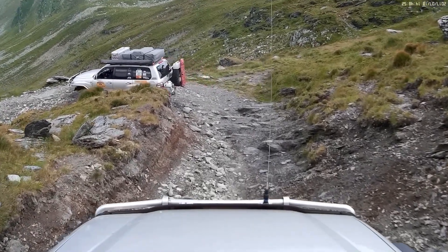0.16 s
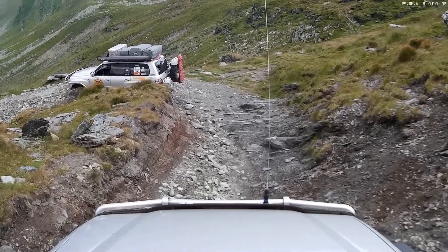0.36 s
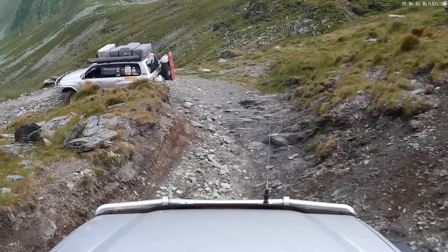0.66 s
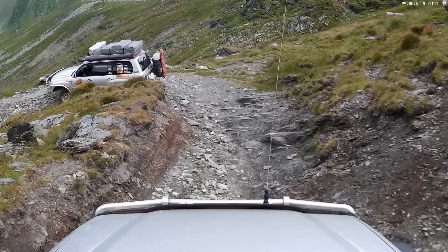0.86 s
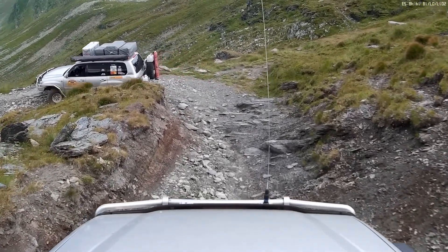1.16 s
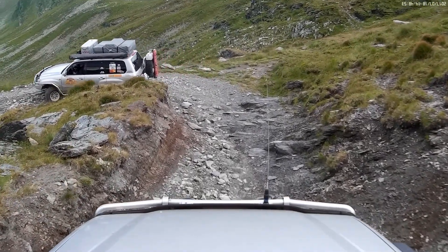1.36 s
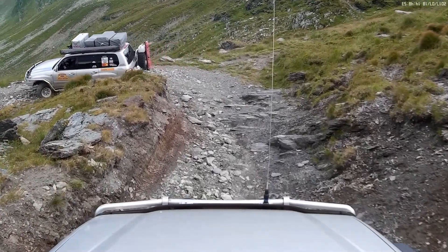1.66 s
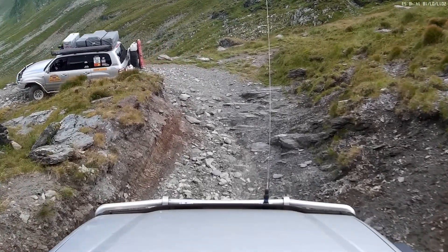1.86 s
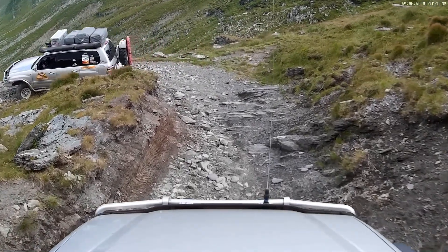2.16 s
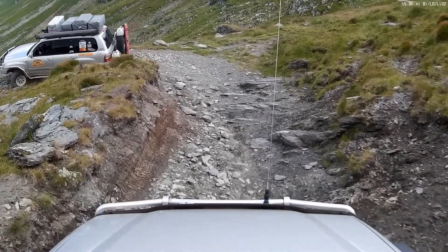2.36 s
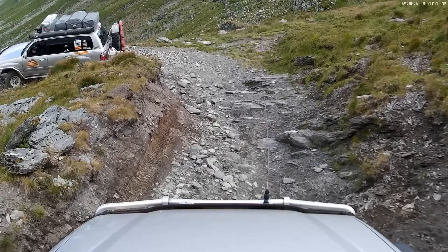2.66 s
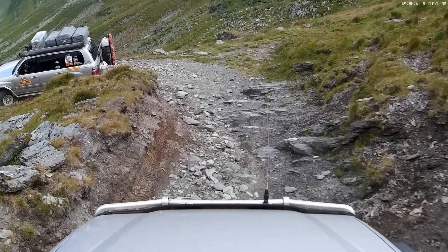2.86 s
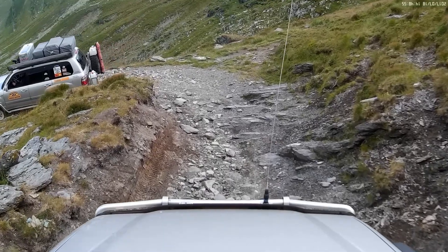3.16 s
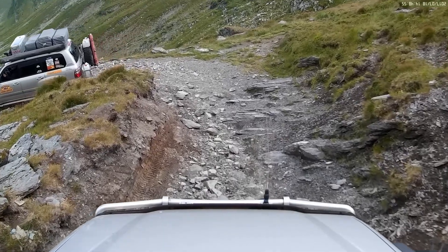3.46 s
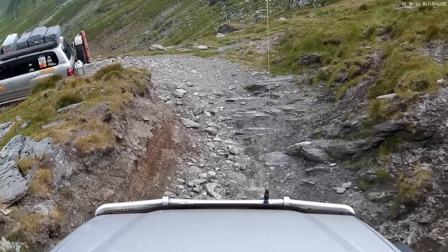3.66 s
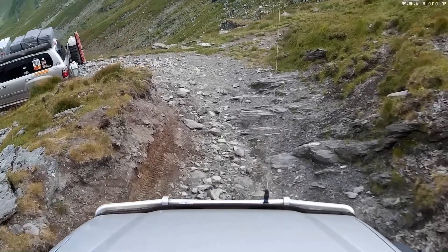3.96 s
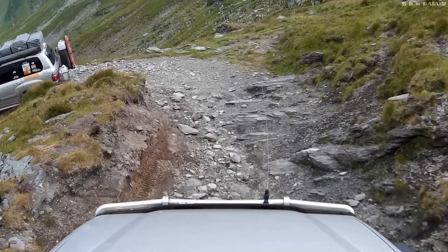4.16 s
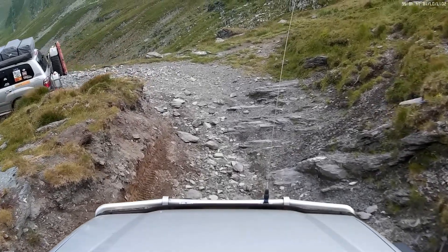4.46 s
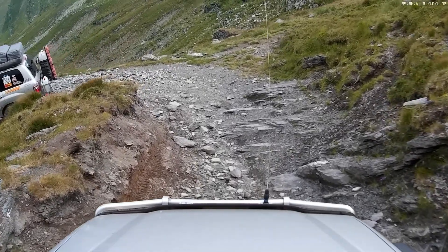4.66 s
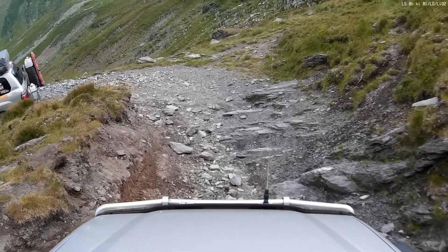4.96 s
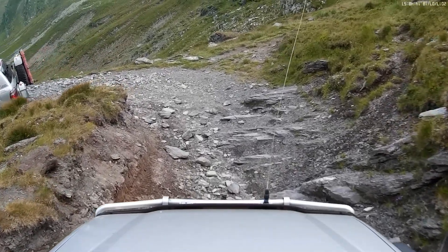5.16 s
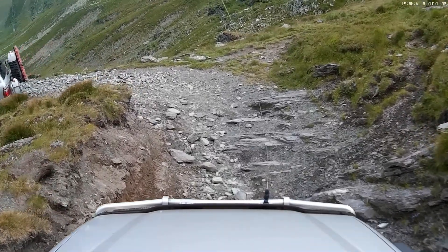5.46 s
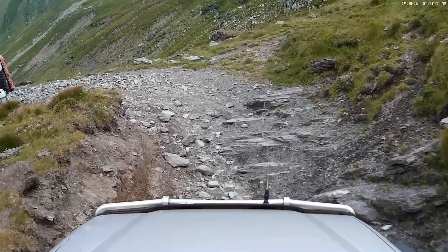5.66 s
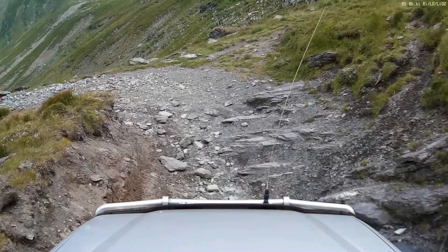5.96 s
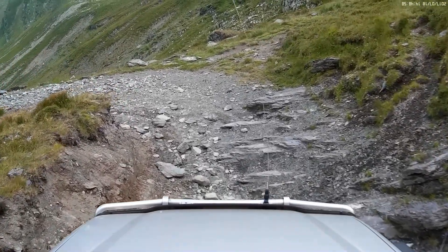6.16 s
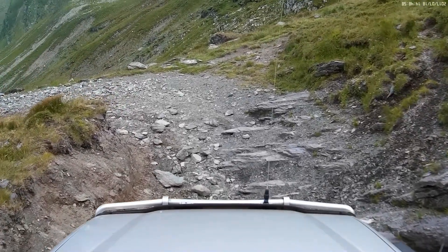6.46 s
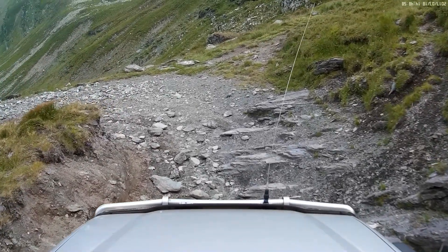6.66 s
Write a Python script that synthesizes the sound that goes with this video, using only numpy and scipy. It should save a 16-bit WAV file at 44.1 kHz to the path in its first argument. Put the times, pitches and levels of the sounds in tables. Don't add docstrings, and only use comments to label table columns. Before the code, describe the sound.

Loose gear slams and rattles against steel inside a four-wheel-drive crawling over rocks, with dull suspension thuds, a sharp metallic crash near three seconds and low diesel drone.

```python
import sys
import numpy as np
from scipy import signal
from scipy.fft import rfft, irfft, next_fast_len
from scipy.io import wavfile
from scipy.ndimage import uniform_filter1d, map_coordinates

SR = 44100
rng = np.random.default_rng(int(sys.argv[2]) if len(sys.argv) > 2 else 0)


def inscribe(sig):
    pcm = np.round(np.clip(np.atleast_2d(sig).T, -1, 1) * 32767)
    wavfile.write(sys.argv[1], SR, pcm.astype(np.int16))


def how_loud(loudness_db):
    steps = np.asarray(loudness_db, float) / 20
    return 10 ** steps


N = 299880
T = np.arange(N) / SR
MIDDLE_DB = -46


def unit(x):
    return x / np.sqrt(np.mean(x ** 2) + 1e-20)


def wobble(rate):
    return map_coordinates(rng.standard_normal(int(N * rate / SR) + 4), [T * rate])


def filtered(x, response):
    m = next_fast_len(N + SR // 2)
    return irfft(rfft(x, m) * response(np.fft.rfftfreq(m, 1 / SR)), m)[:N]


def colour(points):
    f, db = np.transpose(points)
    return lambda hz: how_loud(np.interp(np.log(hz + 1), np.log(f + 1), db))


def resonances(peaks):
    def response(f):
        return sum((-1) ** k * how_loud(db) * 1j * f * width / (hz * hz - f * f + 1j * f * width)
                   for k, (hz, width, db) in enumerate(peaks))
    return response


def smoothed(power):
    return np.abs(uniform_filter1d(uniform_filter1d(power, size=250), size=250)) + 1e-10


def shaken(drive, response, even=0.):
    m = next_fast_len(N + SR // 2)
    body = response(np.fft.rfftfreq(m, 1 / SR)) + 0j
    body = body / np.sqrt(np.mean(np.abs(body) ** 2))
    out = irfft(rfft(drive * rng.standard_normal(N), m) * body, m)[:N]
    if not even:
        return out
    expected = irfft(rfft(drive ** 2, m) * rfft(irfft(body, m) ** 2), m)[:N]
    return out * (smoothed(expected) / smoothed(out ** 2)) ** (even / 2)


def window(start, length, edge):
    return np.clip(np.minimum(T - start, start + length - T) / edge, 0, 1)


def varied(x, depth_db):
    z = signal.stft(x, nperseg=512)[2]
    field = uniform_filter1d(rng.standard_normal(z.shape), size=3, axis=0)
    field = uniform_filter1d(field, size=8, axis=1)
    return signal.istft(z * how_loud(depth_db * unit(field)), nperseg=512)[1][:N]


def jolts(times, levels_db, decays, rise, blow, blow_s):
    power, t = np.zeros(N + SR), np.arange(SR // 3) / SR
    first = blow * how_loud(-60 * t / blow_s)
    onset = 1 - np.exp(-t / rise)
    for s, db, t60 in zip(times, levels_db, np.abs(decays)):
        shake = np.exp(-np.log(1000) * t / t60) * onset
        power[round(s * SR):][:len(t)] += (how_loud(db) * (shake + first)) ** 2
    return np.sqrt(power[:N])


def strikes(times, levels_db, response):
    taps = np.zeros(N)
    taps[np.round(times * SR).astype(int)] = how_loud(levels_db) * np.sqrt(SR)
    body_rms = np.sqrt(np.mean(np.abs(response(np.arange(SR // 2) + .5)) ** 2))
    return filtered(taps, response) / body_rms


# (t/s, engine load level/dB, ground roughness level/dB)
CRAWL_CURVE = [(0, -44.5, -49), (.49, -42, -42.5), (.8, -45.5, -49), (1.29, -45, -47), (1.91, -47, -49.5),
               (2.18, -44.5, -48), (2.55, -49.5, -48), (2.75, -37, -40.5), (2.92, -36.5, -38),
               (3.14, -45.5, -43), (3.69, -46, -49), (4.3, -44.5, -46.5), (4.55, -46.5, -49.5),
               (4.93, -45.5, -44.5), (5.25, -47.5, -48), (5.74, -47, -44.5), (6.15, -50, -48.5),
               (6.8, -47.5, -48)]


def crawl():
    s, *columns = np.transpose(CRAWL_CURVE)
    return [np.interp(T, s, column) for column in columns]


# (t/s, firing f/Hz)
ENGINE_SPEED = [(0, 32.24), (.5, 32.24), (1.2, 31.71), (1.55, 32.9), (2.05, 34.9), (2.6, 34.5), (3.8, 34.6),
                (4.25, 33.3), (4.9, 35.1), (5.3, 33.43), (6.8, 33.5)]


def firing():
    hz = np.interp(T, *np.transpose(ENGINE_SPEED))
    return hz, 2 * np.pi * np.cumsum(hz) / SR


# (f/Hz, level/dB per Hz)
AIR_COLOUR = [(3240, -9), (5500, -1), (6080, -4.5), (7660, -4), (8420, -10), (9850, -7.5), (13800, -11.5),
              (15600, -10)]


def air_hiss():
    ground = crawl()[1] - MIDDLE_DB
    return shaken(how_loud(-66 + 0.59 * ground + 1.2 * wobble(8)), colour(AIR_COLOUR))


# (f/Hz, level/dB per Hz)
RUMBLE_COLOUR = [(8.8, -70), (15, 2.5), (27, -3), (112, -6.5), (140, -4.5), (215, -10), (250, -6.5),
                 (320, -12), (550, -120)]
# (f/Hz, level/dB per Hz)
DRONE_COLOUR = [(120, -41), (200, -7.5), (435, 2.5), (703, -8.5), (1140, -2), (1260, 5), (1470, -6.5),
                (1800, -4), (2010, -15), (2160, -26), (2300, -33), (2990, -65), (5060, -120)]


def cabin():
    rumble_db, drone_db = crawl()
    hz, phase = firing()
    knock_db = 1.73 * np.clip(34.6 - hz, 0, None)
    rumble = shaken(how_loud(rumble_db - 1.0 + 1.5 * wobble(3.57)), colour(RUMBLE_COLOUR))
    drone_db = drone_db + 0.33 + 2.2 * wobble(14) + knock_db * np.cos(phase)
    drone = shaken(how_loud(drone_db), colour(DRONE_COLOUR))
    return varied(rumble + drone, depth_db=1.5)


ORDER_MULTIPLES = [2, 3, 4, 5, 5.5]
# (level/dB at middle speed, slope/dB per Hz of speed, share of load swing)
ORDER_LEVELS = [(-52, -3, 0.25), (-58, -1.5, 0.1), (-58, 4, 0.12), (-63, 2, .1), (-61, -3, 0.092)]


def engine():
    load = crawl()[0] - MIDDLE_DB
    hz, phase = firing()
    faster = hz - 33
    tone_db = -49 + 0.94 * load - 3.5 * faster + 2.2 * wobble(5.3)
    out = how_loud(tone_db) * np.sin(phase + 0.48 * wobble(3.0))
    for k, (db, slope, share) in zip(ORDER_MULTIPLES, ORDER_LEVELS):
        order_db = db + slope * faster + share * load + 2.0 * wobble(3.01)
        out += how_loud(order_db) * np.sin(k * phase + 0.14 * wobble(1.9))
    return out


# (f/Hz, level/dB per Hz)
GRIT_COLOUR = [(1240, -4.5), (2100, -3.5), (2180, -4), (2470, -7.5), (3230, 0), (3780, -9.5), (4500, -10.5),
               (4920, -4.5), (6000, -26), (7800, -29), (13200, -120)]


def tyre_grit():
    ground = crawl()[1] - MIDDLE_DB
    grain_db = 2.2 * wobble(28) + 2.2 * wobble(150)
    return shaken(how_loud(-58.5 + 1.6 * ground + grain_db), colour(GRIT_COLOUR))


# (start t/s, length t/s, level/dB)
GRASSHOPPER_RASPS = [(.3, 0.29, -70), (1.262, 0.16, -63), (1.408, .11, -67), (2.261, 0.23, -69.5),
                     (3.265, 0.21, -63.5), (3.484, 0.066, -63), (4.414, 0.2, -69.5), (5.264, 0.17, -67),
                     (5.457, 0.097, -64), (5.645, .2, -74), (6.281, 0.17, -65.5), (6.478, 0.074, -63)]


def grasshopper():
    gate = sum(how_loud(db) * window(s, length, edge=0.023) for s, length, db in GRASSHOPPER_RASPS)
    stroke = np.cumsum(112 + 9 * wobble(19)) / SR % 1
    chirp_hz = 10700 - 1100 * stroke + 150 * wobble(7.2)
    chirp = np.sin(np.pi * stroke) * np.sin(2 * np.pi * np.cumsum(chirp_hz) / SR)
    wing = resonances([(7500, 700, -5), (10100, 1100, 0), (13200, 1400, -5)])
    return 0.8 * gate * chirp + shaken(0.76 * gate, lambda f: wing(f) ** 2)


# (t/s, level/dB, shake t60/s)
FLOOR_PAN_HITS = [
    (.258, -32, 0.26),
    (.322, -44, 0.41),
    (.605, -46, .3),
    (.652, -35.5, 0.29),
    (1.137, -55, .3),
    (1.237, -44, 0.26),
    (2.807, -33, 0.36),
    (3.19, -53, .3),
    (4.835, -43, 0.51),
    (5.91, -47, .3),
]
# (f/Hz, width/Hz, level/dB)
FLOOR_PAN_MODES = [(435, 17, -1), (1012, 28, -5)]


def floor_pan():
    drive = jolts(*np.transpose(FLOOR_PAN_HITS), rise=.004, blow=0, blow_s=.01)
    return shaken(drive, resonances(FLOOR_PAN_MODES), even=.8)


# (start t/s, length t/s, f/Hz, level/dB, flutter level/dB)
SHORT_SQUEAKS = [
    (2.904, 0.034, 7720, -39, 1),
    (2.951, 0.043, 7560, -48, -4),
    (3.111, 0.11, 6060, -63, 4),
]
# (start t/s, length t/s, level/dB)
MOUNT_SQUEAKS = [
    (.26, 0.25, -69),
    (3.436, 0.046, -77),
    (4.276, .13, -77),
    (6.4, 0.13, -79),
]
# (f/Hz, level/dB, flutter level/dB)
MOUNT_CHORD = [(5600, -1, -7), (8560, -6, 2), (11400, -2, 4), (12700, -8, 4), (14115, 0, 4), (14900, -5, 3)]


def mount_squeaks():
    tones = SHORT_SQUEAKS + [(s, length, hz, db + more, flutter)
                             for s, length, db in MOUNT_SQUEAKS for hz, more, flutter in MOUNT_CHORD]
    shake, drift = wobble(70), 0.9 * wobble(120) + 1.5 * wobble(22)
    return sum(how_loud(db + flutter * shake) * window(s, length, edge=0.019) * np.sin(2 * np.pi * hz * T + drift)
               for s, length, hz, db, flutter in tones)


# (t/s, f/Hz, level/dB)
BRAKE_SQUEAL = [
    (4.46, 6070, -81),
    (4.5, 6100, -64),
    (4.57, 6106, -58),
    (4.69, 6140, -68),
    (4.72, 6120, -61),
    (4.746, 6154, -78),
    (4.872, 6120, -63),
    (5.014, 6000, -65),
    (5.07, 6100, -84),
]


def brake_squeal():
    s, hz, db = np.transpose(BRAKE_SQUEAL)
    slip = np.abs(np.sin(np.pi * 34 * T + 0.97 * wobble(7.7) + .6)) ** 0.53
    beat = slip * how_loud(1.5 * wobble(72))
    tone = np.sin(2 * np.pi * np.cumsum(np.interp(T, s, hz)) / SR + 0.51 * wobble(120))
    return how_loud(np.interp(T, s, db) + 6.5) * window(s[0], s[-1] - s[0], edge=0.084) * beat * tone


# (t/s, level/dB)
BUSH_SWELL = [
    (0.2, -69),
    (.37, -45.5),
    (.41, -41),
    (.43, -49),
    (.445, -63),
]


def bush():
    swell_db = np.interp(T, *np.transpose(BUSH_SWELL), left=-120, right=-120)
    return how_loud(swell_db + 1.7 * wobble(60.7)) * np.sin(2 * np.pi * 3395 * T + 0.38 * wobble(51))


# (start t/s, length t/s, from f/Hz, to
# f/Hz, level/dB)
METAL_SINGS = [(2.806, 0.055, 4160, 4200, -40), (2.858, .035, 3380, 3420, -34),
               (2.9, 0.081, 3500, 3530, -44), (2.954, 0.057, 3520, 3600, -47),
               (2.816, .12, 6950, 6900, -56.5), (2.895, 0.022, 4800, 4850, -50),
               (2.94, 0.028, 4900, 5020, -55), (2.975, 0.026, 4700, 4640, -48),
               (3.032, 0.047, 4860, 4890, -51), (3.082, 0.035, 3380, 3250, -45),
               (3.721, 0.17, 3250, 3220, -75), (2.97, 0.051, 10450, 10400, -68),
               (3.488, .046, 10350, 10250, -62), (3.488, .046, 11150, 11050, -63)]


def metal_sings():
    flutter, drift = 4 * wobble(130), 1.5 * wobble(200)
    out = np.zeros(N)
    for s, length, start_hz, end_hz, db in METAL_SINGS:
        t = T - s
        cycles = start_hz * t + (end_hz - start_hz) * t ** 2 / (2 * length)
        out += how_loud(db + flutter) * window(s, length, edge=0.011) * np.sin(2 * np.pi * cycles + drift)
    return out


# (start t/s, length t/s, f/Hz, width/Hz, level/dB)
METAL_SCRAPES = [(2.84, 0.178, 3360, 450, -40.5), (2.89, 0.18, 3750, 500, -50),
                 (3.06, 0.12, 3260, 440, -46), (2.95, .1, 3500, 900, -47), (2.9, 0.06, 3320, 180, -44),
                 (2.83, 0.15, 6800, 400, -59), (2.882, .13, 7370, 500, -55), (3.08, 0.04, 7000, 401, -50),
                 (4.673, 0.026, 3180, 252.7, -42), (2.86, 0.14, 11300, 3000, -59),
                 (5.9, 0.21, 9700, 600, -68), (5.62, .28, 10700, 3000, -72.5),
                 (5.62, 0.14, 7740, 1500, -67), (1.25, 0.11, 13500, 2000, -67)]


def metal_scrapes():
    slips = 3 * wobble(200) + 2.5 * wobble(700)
    return sum(shaken(how_loud(db + slips) * window(s, length, edge=0.058),
                      lambda f: resonances([(hz, width, 0)])(f) ** 2)
               for s, length, hz, width, db in METAL_SCRAPES)


# (t/s, peak level/dB, f/Hz, t60/s)
THUDS_AND_KNOCKS = [(0.474, -25.5, 258, 0.038), (0.5236, -15.5, 230, 0.02), (0.5271, -18.5, 317, 0.051),
                    (0.77, -33.5, 344, 0.064), (1.0998, -14.5, 244, 0.03), (1.1185, -27.5, 265, 0.061),
                    (1.455, -36, 468, 0.085), (2.114, -30.5, 389, 0.047), (2.213, -34.5, 372, 0.05),
                    (2.714, -31, 184, 0.074), (2.805, -28, 462, 0.096), (2.899, -31.5, 270.7, 0.18),
                    (3.1632, -15, 326, 0.055), (3.665, -36, 222.2, 0.062), (4.978, -33, 274, 0.092),
                    (2.553, -42, 91, 0.17),
    (2.586, -32, 432, 0.07),
    (6.281, -30.5, 256, 0.057),
    (6.383, -39, 161, .08),
    (2.762, -32, 540, 0.11),
    (2.9, -35, 85.4, 0.43),
    (2.8, -34.5, 23.7, .7),
    (4.06, -24.5, 290, 0.028),
    (4.155, -30.5, 500, 0.054),
    (4.304, -23, 570, 0.028),
]


def thuds():
    out, clatter, t = np.zeros(N + SR), np.zeros(N + SR), np.arange(SR // 4) / SR
    partners = [(.45, 0.34), (.75, 0.77), (1, 1), (1.12, 0.73), (1.42, 0.59), (3.0, 0.13)]
    sway = 0.15 * np.sin(2 * np.pi * 62 * t) * how_loud(-60 * t / 0.086) * (1 - np.exp(-t / 0.0091))
    for s, db, hz, t60 in THUDS_AND_KNOCKS:
        ring = sum(gain * np.sin(2 * np.pi * ratio * hz * t) for ratio, gain in partners)
        fall = how_loud(db - 60 * t / abs(t60)) * (1 - np.exp(-t / 0.0042))
        out[round((s + .0028) * SR):][:len(t)] += how_loud(3.0) * fall * ring + how_loud(db) * sway
        clatter[round((s + .0035) * SR):][:len(t)] += how_loud(-14.0) * fall
    wood = resonances([(534, 120, 1.5), (850, 280, -1.5), (1240, 200, -2.5)])
    return out[:N] + shaken(clatter[:N], lambda f: wood(f) / (1 + 1j * f / 1800) ** 2)


# (t/s, peak level/dB, f/Hz, cycles to fall 60 dB)
STONE_SNAPS = [(1.1064, -40, 2810, 11), (1.112, -44, 1500, 9), (2.715, -26, 640, 23), (2.805, -19, 764, 12),
               (2.8068, -3.5, 1643, 40), (2.808, -10.5, 3000, 40), (2.817, -10, 1450, 18),
               (2.8211, -5, 1746, 45), (2.8301, -6, 1720, 40), (2.838, -20, 3400, 12),
               (2.85, -14, 3030, 20), (2.8945, -18, 3240, 24), (3.144, -19, 1460, 15),
               (3.1712, -34, 2880, 16), (3.369, -14, 1700, 17), (4.0635, -29, 736, 9), (4.158, -34, 760, 8),
               (4.682, -40, 3140, 14), (4.905, -24, 1500, 12), (6.352, -24.5, 1344, 26),
               (6.417, -24.5, 1300, 25), (6.442, -27, 1300, 20)]


def stone_snaps():
    out, t = np.zeros(N + SR), np.arange(SR // 20) / SR
    for s, db, hz, cycles in STONE_SNAPS:
        ring = np.sin(2 * np.pi * hz * t) + 0.15 * np.sin(2 * np.pi * 0.83 * hz * t)
        ring += 0.0081 * rng.standard_normal(len(t))
        fall = how_loud(db - 60 * t * hz / cycles) * (1 - np.exp(-t * hz / (0.041 * cycles)))
        out[round(s * SR):][:len(t)] += fall * ring
    return out[:N]


# (t/s, peak level/dB, panel ring level/dB, shake t60/s)
GEAR_SLAMS = [(0.257, -22, 3, 0.14), (0.288, -30, 5, 0.068), (0.3219, -23, 3.5, 0.15),
              (0.4632, -32, 5, 0.12), (0.6036, -24.5, 4.5, 0.23), (0.651, -27, 3.5, 0.21),
              (1.235, -26.5, 4, 0.26), (2.573, -30, 5, 0.17), (2.6495, -33, 0, 0.15),
              (2.6575, -37.5, 10, 0.21), (2.751, -27.5, 3.5, 0.17), (2.7752, -24.5, 6.5, 0.15),
              (2.8061, -12.5, 4, 0.16), (2.835, -33, 12, 0.14), (2.851, -32, 8.5, 0.27),
              (2.8675, -37, 4, .17), (2.895, -29, 6.5, 0.4), (2.971, -29.5, 6, 0.16),
              (2.9783, -33.5, 14, 0.17), (3.033, -29.5, 8, 0.13), (3.187, -22, -1, 0.12),
              (3.244, -24, 5.5, 0.17), (3.3489, -26.5, 7, 0.25), (3.47, -26, 3, 0.25),
              (3.4995, -29, 5.5, 0.14), (4.2731, -32, 4.5, 0.16), (4.3236, -30, 0, 0.15),
              (4.8321, -32, 5.5, 0.2), (4.859, -32.5, 5, 0.21), (5.427, -28.5, 4, 0.24),
              (5.91, -34, 6.5, 0.22), (5.931, -30.5, 4, 0.22), (5.959, -28.5, -3, 0.16)]
# (t/s, peak level/dB, panel ring level/dB)
GEAR_RATTLES = [(0.045, -38.5, 7), (0.073, -35, 4), (0.1607, -36.5, 5), (0.2251, -38, 7.5),
                (0.5066, -35, 6.5), (0.8108, -37.5, 4.5), (1.051, -39, 3), (1.135, -33, 2),
                (1.1995, -33, 4.5), (1.6307, -34.5, 3.5), (1.8711, -38.5, 4.5), (2.307, -37, 3.5),
                (2.4678, -31, 4), (3.091, -33.5, 7), (3.121, -38, 12.5), (3.359, -30, -7),
                (3.687, -37.5, 4), (3.945, -31.5, 5.5), (4.074, -34.5, 3.5), (4.637, -34, 2),
                (4.785, -38, 4.5), (4.881, -32.5, 8.5), (4.9442, -33.5, 3.5), (5.2089, -34, 6.5),
                (5.2676, -35.5, 5.5), (5.306, -36, 6), (5.345, -37, 2), (6.2659, -32.5, 4.5),
                (6.337, -32, 2), (6.4129, -36.5, 4.5)]
# (t/s, peak level/dB, panel ring level/dB)
GEAR_TICKS = [(.14, -39.5, 4), (0.886, -47, 12), (1.035, -61, 0), (1.6018, -58, -5), (1.7775, -54, 5),
              (2.175, -49, 4), (4.821, -37.5, 6), (6.743, -59, 3), (3.047, -37.5, 12.5), (3.07, -40, 13),
              (1.4951, -43, 6), (1.5327, -43.5, 9.5), (1.807, -45.5, 11), (1.8198, -37.5, 6),
              (1.942, -38.5, 3), (2.2548, -44, -2.5), (2.4315, -45, 4), (4.2174, -52, -5), (2.1, -48.5, 5),
              (4.3887, -46.5, 7), (4.6848, -39.5, 5.5), (5.654, -45, 9), (.974, -59, 8), (.53, -43, 2),
              (3.937, -52, 5), (4.76, -59, 2), (5.768, -39, 5.5), (5.832, -38.5, 6), (5.9889, -43.5, 12.5),
              (6.5296, -45.5, 6), (6.572, -44.5, 4.5), (6.715, -48, 6.5), (6.774, -47.5, 3)]
# (t/s, peak level/dB)
FLOOR_BUMPS = [(.2894, -37), (1.112, -32.5), (1.533, -33), (1.8205, -31), (2.125, -31.5), (2.177, -36),
               (2.894, -22), (4.389, -37), (4.99, -29.5), (5.9894, -41), (6.715, -47)]
# (f/Hz, width/Hz, level/dB)
PANEL_MODES = [(1012, 8.1, -4.5), (1271.5, 28, -4.5), (1394, 15, -3.5), (1538, 7.5, 0), (1620, 18, -1),
               (1667, 20, -1.5), (1739.4, 25, 5), (1776, 15, 3), (1827, 22, -1.5), (1883, 15, 1),
               (1975, 18, -3), (2053, 8.4, -13)]
# (f/Hz, width/Hz, level/dB)
GEAR_MODES = [(2295, 22, 3.5), (2386, 13, 8), (2460, 17, 4), (2590, 14, 8), (2790, 12, 2.5),
              (2950, 24, 8.5), (3025, 20, 0), (3080, 18, 0), (3150, 78, -10), (3290, 30, 5.5),
              (3360, 7.9, 6.5), (3440, 12, 1.5), (3440, 30, 6), (3650, 11, -1.5),
              (3830, 12, -5), (4040, 26, -1), (3968, 11, 3), (4040, 16, 3.5), (4150, 13, 0), (4360, 13, 3),
              (4530, 15, -3), (4680, 33, 6), (4730, 36, 0), (4800, 17, -2), (4925, 20, 3.5), (5050, 34, 6),
              (5050, 24, -5), (5300, 26, 4)]
# (f/Hz, width/Hz, level/dB)
CASE_HUMPS = [(2990, 500, -1.5), (3930, 250, -9), (4850, 490, -2)]
# (f/Hz, width/Hz, level/dB)
TRIM_MODES = [(6570, 32, -6.5), (7700, 126, 1.5), (8940, 58, -11.5), (9590, 35, 1), (11700, 75, -22),
              (14100, 38, -12)]
# (f/Hz, level/dB per Hz)
FLOOR_BOOM = [(88, -38), (150, -11.5), (421, 4), (510, -0.5), (714, -7.5), (982, 0), (1180, -4.5),
              (1340, -11), (1500, 0.5), (1950, -25), (3300, -120)]


def rattles():
    hits = GEAR_SLAMS + [(*row, 0.2) for row in GEAR_RATTLES] + [(*row, 0.15) for row in GEAR_TICKS]
    s, db, ring_db, t60 = np.transpose(hits)
    harder = db + 35
    chatter = how_loud(1.4 * wobble(220))
    crackle = chatter * how_loud(3.5 * wobble(1200) - 1.5)

    def steep(f):
        return (f / 2300) ** 3 / (1 + (f / 2300) ** 3)

    def soft(f):
        return 1 / (1 + (f / 12500) ** 6)

    panel_body = resonances(PANEL_MODES)
    panel_drive = jolts(s, db + ring_db - 8, 0.98 * t60, rise=0.0012, blow=1.48, blow_s=0.016)
    panel = shaken(chatter * panel_drive, panel_body, even=.75)
    panel += strikes(s + 0.001229, db + ring_db - 27, panel_body) / 2

    def gear_body(f):
        modes = resonances(GEAR_MODES)(f) + resonances(CASE_HUMPS)(f) + 0.26
        return modes * steep(f) * soft(2.56 * f)

    gear_drive = jolts(s, db - 15.5, 1.18 * t60, rise=0.0011, blow=1.58, blow_s=0.022)
    gear = shaken(crackle * gear_drive, gear_body, even=.75)
    gear += strikes(s + .0004, db - 39.5, gear_body)

    trim_modes = resonances([(hz, 2.4 * width, level) for hz, width, level in TRIM_MODES])
    trim_db = db - 24 - 0.2 * harder
    trim_drive = jolts(s, trim_db, 1.07 * t60, rise=0.0024, blow=0.6, blow_s=0.046)
    trim = shaken(crackle * trim_drive, lambda f: (trim_modes(f) + 0.19) * steep(f / 0.94) * soft(f))

    bump_s, bump_db = np.transpose(FLOOR_BUMPS)
    floor_db = np.r_[db - 3 - 0.062 * harder, bump_db] - 6.0
    floor_t60 = 1.95 * np.r_[t60, 0.088 + 0 * bump_s]
    floor_drive = jolts(np.r_[s, bump_s], floor_db, floor_t60, rise=0.009, blow=0.94, blow_s=0.012)
    floor = shaken(floor_drive, colour(FLOOR_BOOM))
    return varied(panel + gear + trim + floor, depth_db=.8)


def scene():
    background = air_hiss() + cabin() + engine() + tyre_grit() + grasshopper()
    squeaks = mount_squeaks() + brake_squeal() + bush() + metal_sings() + metal_scrapes()
    blows = floor_pan() + thuds() + stone_snaps() + rattles()
    return (background + squeaks + blows)[None]


def top_cut(x):
    return signal.sosfilt(signal.butter(12, 15710, fs=SR, output="sos"), x)


def record(dry):
    dulled = filtered(dry[0], lambda f: 1 / np.sqrt(1 + (f / 14800) ** 24) * (f < 15750))
    return top_cut(dulled[None])


dry = scene()
out = record(dry)
inscribe(out)
```